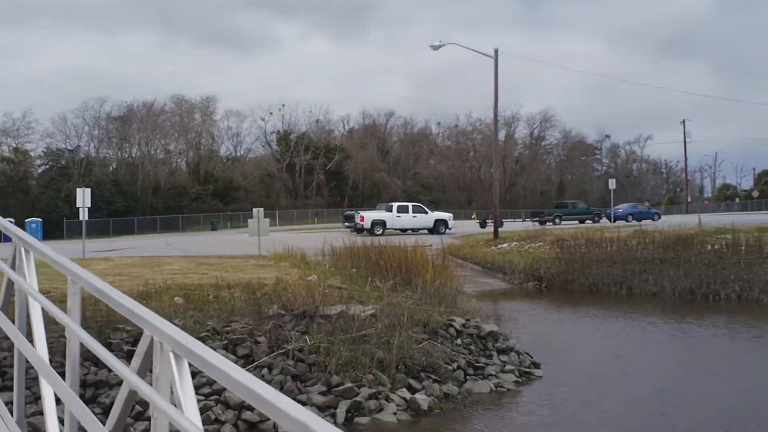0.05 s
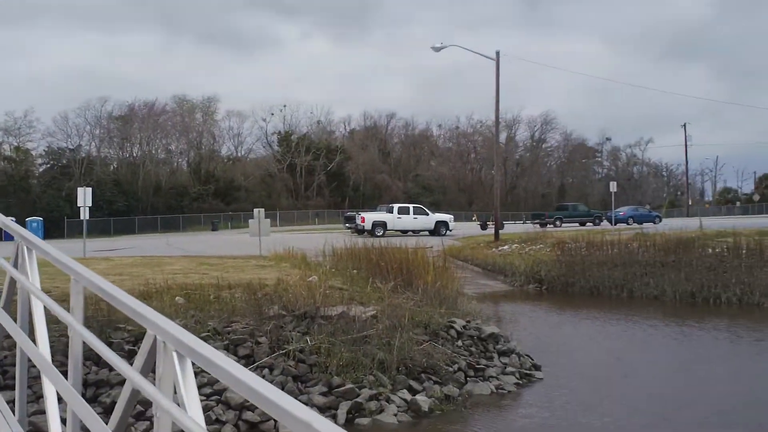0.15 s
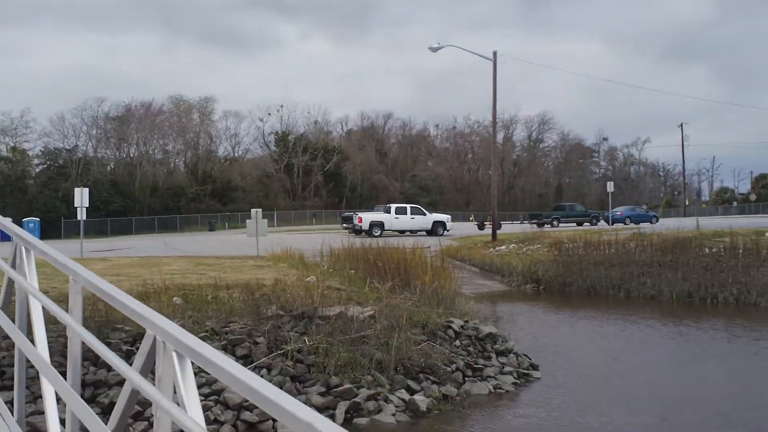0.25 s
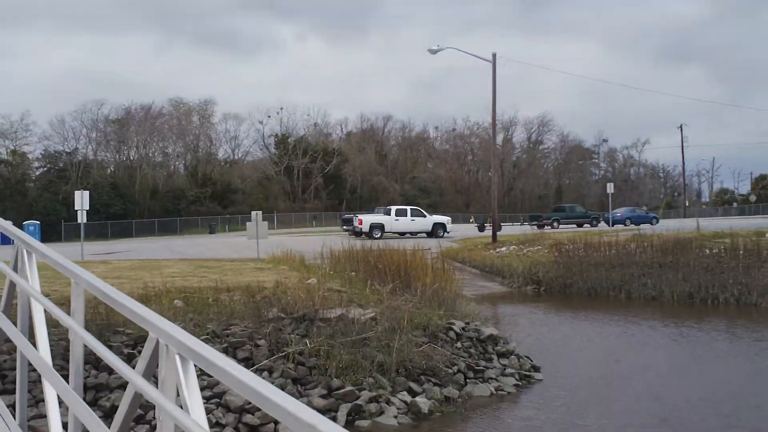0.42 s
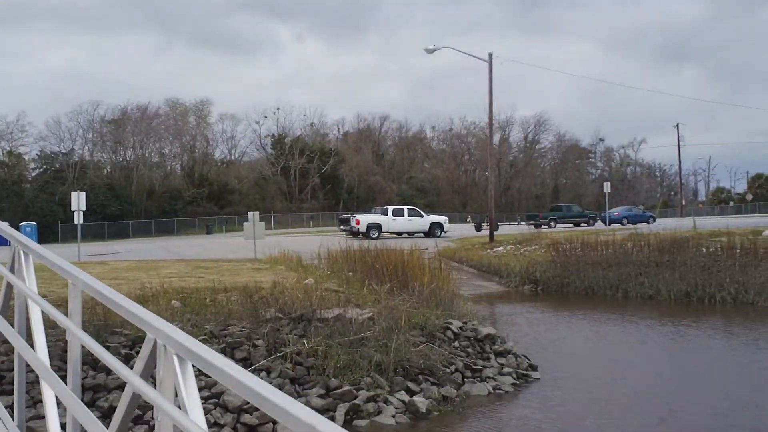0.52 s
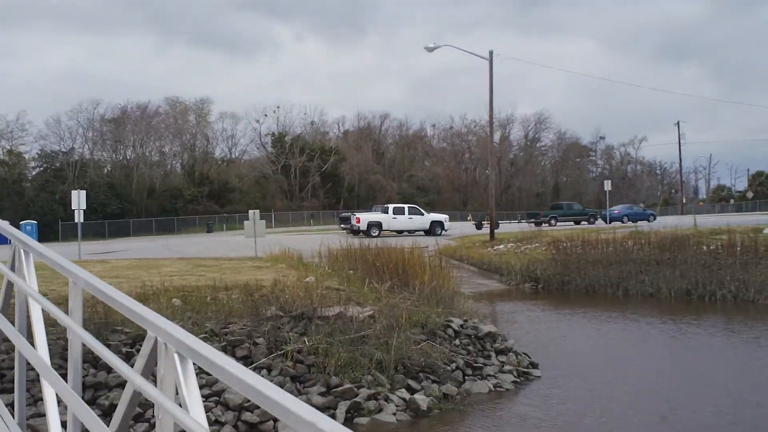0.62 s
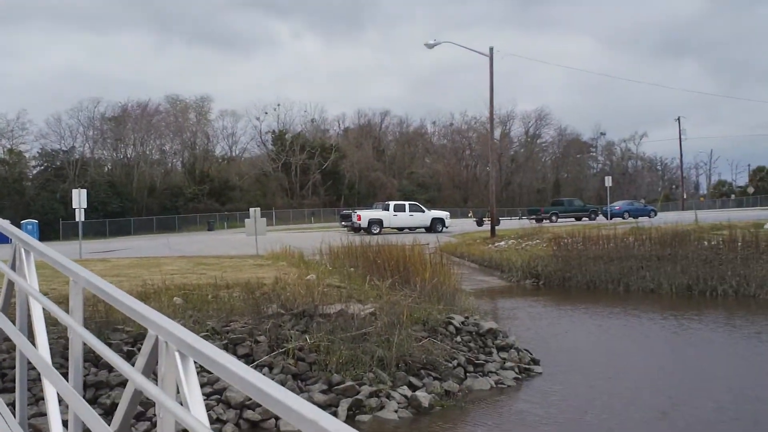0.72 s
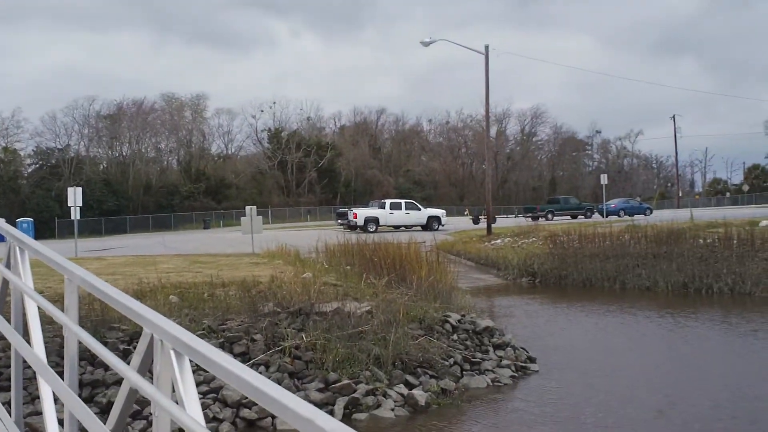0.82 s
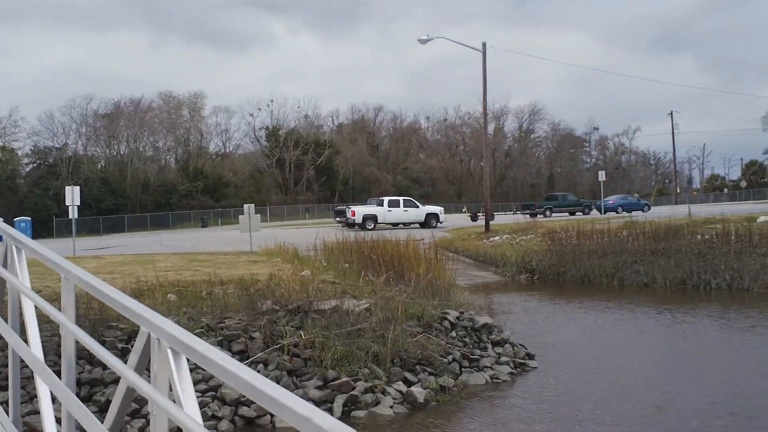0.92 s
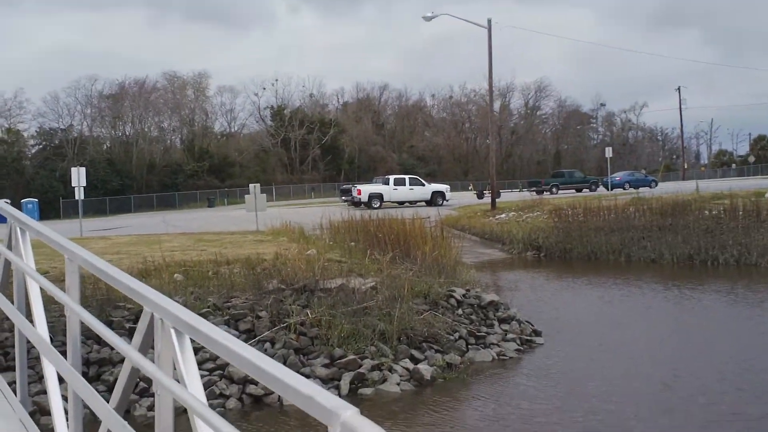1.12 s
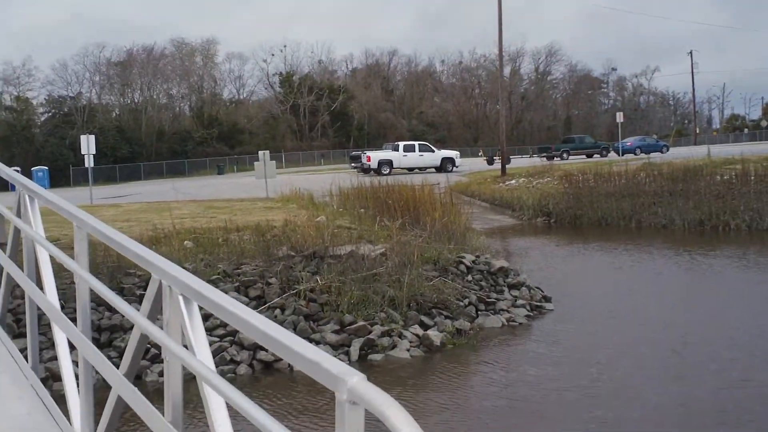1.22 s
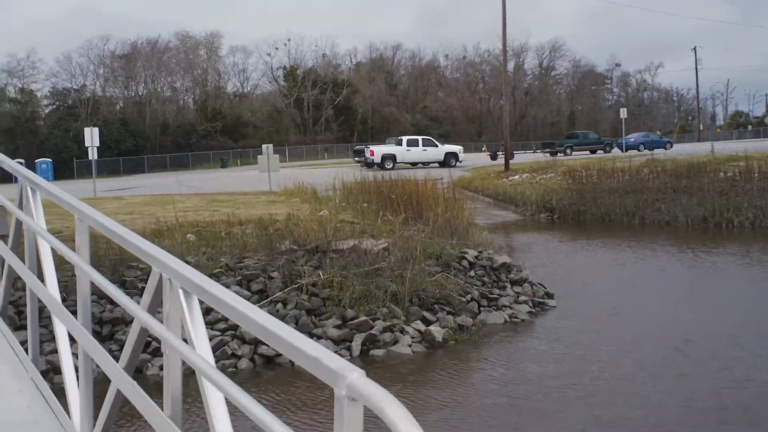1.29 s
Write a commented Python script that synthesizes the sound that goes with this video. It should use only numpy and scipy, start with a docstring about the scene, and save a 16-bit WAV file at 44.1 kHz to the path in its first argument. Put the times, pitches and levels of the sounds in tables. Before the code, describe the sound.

Wind buffets the microphone outdoors by the water, thumping hardest midway as a gust passes. Far traffic hums underneath with two barely audible chirps early on, and one sharp, close handling click comes last.

```python
"""Beside a river, light wind buffets a hand-held microphone over the wash of distant traffic.
Two faint chirps sound far off. Small whirls of air (eddies) thump the microphone's opening,
and one gust swells in the middle. The camera's plastic case ticks faintly, then clicks
sharply just before the sound stops."""
import sys
import numpy as np
from scipy import signal
from scipy.fft import rfft, irfft
from scipy.io import wavfile
from scipy.ndimage import uniform_filter1d

SR = 44100
rng = np.random.default_rng(int(sys.argv[2]) if len(sys.argv) > 2 else 0)


def put_to_file(sound):
    """Save the sound as 16-bit audio at rate SR, in the file named by the first command-line argument."""
    columns = np.atleast_2d(sound).T  # one column per channel
    safe = np.clip(columns, -1, 1)
    whole_steps = np.round(safe * 32767)
    wavfile.write(sys.argv[1], SR, whole_steps.astype(np.int16))


N = 59535


def gain_of(db):
    """Turns decibels into a number to multiply by."""
    return 10 ** (np.asarray(db) / 20)


def unit_level(x):
    """Scales a sound to an average (rms) level of 1."""
    return x / np.sqrt(np.mean(x ** 2) + 1e-20)


def curve(points):
    """Joins (time, value) points with straight lines."""
    return np.interp(np.arange(N) / SR, *np.transpose(points))


def noise(tone):
    """Noise whose lows and highs follow a table of f/Hz, level/dB."""
    hz, db = np.transpose(tone)
    tone_db = np.interp(np.log(np.fft.rfftfreq(N, 1 / SR) + 1), np.log(hz), db)
    return unit_level(irfft(rfft(rng.standard_normal(N)) * gain_of(tone_db), N))


def steadied(x):
    """Smooths away the slow chance swells in a noise."""
    return x / np.sqrt(uniform_filter1d(x ** 2, 1800) + 1e-6)


def wave_burst(cycles, half_length, phase):
    """A short wave that fades in and out. All three inputs count cycles."""
    return np.exp(-.5 * (cycles / half_length) ** 2) * np.cos(2 * np.pi * (cycles + phase))


def swell(u):
    """Rises to 1 at u = 1, then dies away."""
    return (u * np.exp(1 - u)) ** 2.9


def add(mix, s, sound):
    """Mixes a sound in, starting at s seconds."""
    part = mix[round(s * SR):][:len(sound)]
    part += sound[:len(part)]


# Tone of the far traffic and air: f/Hz, level/dB
WASH_TONE = [(25, -15), (60, -5), (250, -11), (430, -4), (580, -8), (860, -5), (1100, -10.5), (1550, -14),
             (2000, -20), (3200, -24), (5300, -27.5), (7300, -29.5), (9500, -31.5), (15300, -34)]
# Soft swells in that wash: t/s, level/dB
SWELL_LEVELS = [(0, -51.5), (.3, -59.5), (.45, -55.5), (.7, -57), (.97, -50), (1.1, -57.5), (1.2, -49)]
# Tone of the swells: f/Hz, level/dB
SWELL_TONE = [(700, -31), (1150, -2), (1450, 0.5), (1900, -10), (4000, -21.5), (7000, -35.5)]
# Tyre hum of a car driving away: t/s, level/dB
TYRE_LEVELS = [(0, -48.5), (.1, -44), (.3, -52.5), (.55, -52), (1.2, -57.5)]

def traffic():
    """Far traffic blurs into a softly swelling wash while one car's tyre hum fades."""
    hz = np.fft.rfftfreq(N, 1 / SR)
    hum_hz, width_hz = 860, 260
    band = 1 / (1 + ((hz - hum_hz) / (width_hz / 2)) ** 4)
    tyres = unit_level(irfft(rfft(rng.standard_normal(N)) * band, N))
    wash = gain_of(-41) * noise(WASH_TONE)
    swells = gain_of(curve(SWELL_LEVELS)) * noise(SWELL_TONE)
    return wash + swells + gain_of(curve(TYRE_LEVELS)) * tyres


# Strength of the wind: t/s, level/dB
WIND_LEVELS = [(0, -39), (.17, -42), (.25, -33.5), (.32, -39), (.41, -33.5), (.47, -35.5), (.56, -32.5),
               (.62, -34.5), (.64, -27.5), (.69, -26.5), (.74, -28), (.77, -28.5), (.81, -33), (.89, -32),
               (.96, -31.5), (1.06, -36), (1.13, -37.5), (1.2, -33.5)]
# Tone of its deep rumble: f/Hz, level/dB
RUMBLE_TONE = [(15, -23), (28, -10.5), (50, -1), (105, 5), (170, 0), (235, -1), (330, -18), (480, -30),
               (900, -34.5), (2500, -74)]
# Tone of its brighter flutter: f/Hz, level/dB
FLUTTER_TONE = [(80, -28.5), (180, -1.5), (300, 0), (380, -3.5), (500, -16.5), (720, -21.5), (1100, -25.5),
                (2500, -70.5)]

def wind():
    """Air swirling at the microphone rumbles, and flutters too when it blows hard."""
    wind_db = curve(WIND_LEVELS)
    gust_db, growth = -27.5, 3.4  # the flutter gains 3.4 dB for each dB of wind
    flutter_db = -28 + growth * (wind_db - gust_db)
    rumble = gain_of(wind_db) * steadied(noise(RUMBLE_TONE))
    flutter = gain_of(flutter_db) * steadied(noise(FLUTTER_TONE))
    return rumble + flutter


# Far chirps: t/s, level/dB, f/Hz, half length/s
CHIRP_NOTES = [(.112, -48, 5160, .003), (0.223, -59, 3720, 0.015)]

def chirps():
    """Brief pure notes, probably a bird, barely rise above the traffic."""
    t = np.arange(N) / SR
    return sum(gain_of(db) * wave_burst((t - s) * hz, half_s * hz, 0)
               for s, db, hz, half_s in CHIRP_NOTES)


# Eddies hitting the microphone: t/s, level/dB, f/Hz, half length/cycles, edge against thump/dB
EDDY_THUMPS = [(0.238, -20, 107.4, 0.8, -34), (0.291, -26, 98, .6, -25), (0.376, -25.5, 159, 0.36, -4),
               (.429, -22, 158, 0.46, -11), (0.534, -25, 176, .8, -31), (0.569, -20, 80.6, 0.49, -25),
               (.636, -10.5, 211, 0.26, -26), (0.65, -13, 239, 0.23, -21.5), (0.676, -18, 190, 1.2, -22),
               (.685, -17.5, 636, 1.32, -23.5), (.687, -11.5, 331, 0.71, -16),
               (.691, -8.5, 159.6, 0.59, -17), (.726, -12, 206.5, 0.76, -15.5), (.738, -19, 386, 0.75, -9),
               (0.843, -15, 133, 0.33, -28), (0.882, -22, 154, 0.34, -11), (.932, -11.5, 135, 0.39, -8),
               (0.978, -24, 235, 1, -6), (1.164, -26.5, 130, 0.96, -29.5), (1.195, -28, 126.3, 0.59, -23.5)]

def eddies():
    """Each whirl of air swings the pressure back and forth: a thump with a sharper edge."""
    t, out = np.arange(N) / SR, np.zeros(N)
    for s, db, hz, half_length, edge_db in EDDY_THUMPS:
        cycles = (t - s) * hz
        thump = wave_burst(cycles, half_length, phase=rng.random())
        edge = wave_burst(cycles * 2.6, half_length=.38, phase=rng.random())
        out += gain_of(db) * (thump + gain_of(edge_db) * edge)
    bass_cut = signal.butter(2, 34.5, "high", fs=SR, output="sos")  # weakens the deepest lows
    return signal.sosfilt(bass_cut, out)


# Clicks of the case: t/s, level/dB, pitch multiplier, length multiplier
CASE_CLICKS = [(0.564, -27, 1.21, 0.53), (1.1866, 1, 1.049, 1)]
# Notes the case rings at, before each click's multipliers: f/Hz, level/dB, rise time/s
CASE_NOTES = [(1093, -25.5, 0.00077), (2050, -29, 0.0012), (3610, -2.5, 0.00075), (4030, -11.5, .0005),
              (5750, -19, 0.00093), (6460, -15.5, 0.00058), (7430, -25, 0.00094), (11500, -37, 0.00071)]
# Tone of the faint hiss after a click: f/Hz, level/dB
TAIL_TONE = [(1500, -24.5), (3200, -3), (4600, 0), (7000, -13.5), (9500, -26)]

def case_clicks():
    """A tiny snap, a quickly dying ring of the plastic case, and a short tail of hiss."""
    t, out = np.arange(2048) / SR, np.zeros(N)
    snap_s, tail_s = .00084, .018  # time for the snap to peak; for the tail to fall 60 dB
    for s, db, pitch, length in CASE_CLICKS:
        ring = sum(gain_of(note_db) * swell(t / (rise_s * length)) * np.sin(2 * np.pi * hz * pitch * t)
                   for hz, note_db, rise_s in CASE_NOTES)
        grit = unit_level(signal.lfilter([1], [1, -.75], rng.standard_normal(len(t))))  # dulled noise
        snap = gain_of(-29) * swell(t / snap_s) * grit
        tail_gain = gain_of(-25 - 60 * t / tail_s) * np.minimum(t / snap_s, 1)
        tail = tail_gain * noise(TAIL_TONE)[:len(t)]
        add(out, s, gain_of(db) * (ring + snap + tail))
    return out


def scene():
    """Adds all the sounds into one channel."""
    return (traffic() + wind() + chirps() + eddies() + case_clicks())[None]


# Narrow bands the microphone hears poorly: f/Hz, width/Hz
MIC_DIPS = [(7900, 780), (11000, 390)]

def record(dry):
    """The microphone loses two narrow bands and the highest treble; the sound stops abruptly."""
    stop_s, top_hz = 1.21, 15600
    heard = dry
    for hz, width_hz in MIC_DIPS:
        notch = signal.iirnotch(hz, hz / width_hz, SR)
        heard = signal.lfilter(*notch, signal.lfilter(*notch, heard))
    fade_out = np.clip((stop_s - np.arange(N) / SR) / .001, 0, 1)
    treble_cut = signal.firwin(255, top_hz, window=("kaiser", 9), fs=SR)
    return signal.oaconvolve(heard * fade_out, treble_cut[None], "same")


dry = scene()
out = record(dry)
put_to_file(out)
```